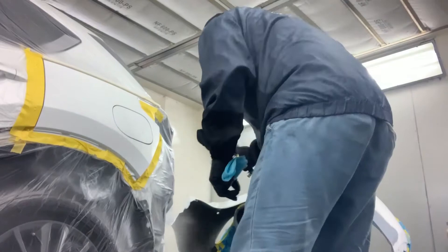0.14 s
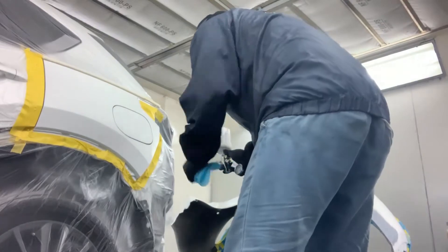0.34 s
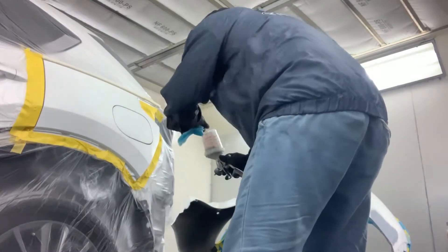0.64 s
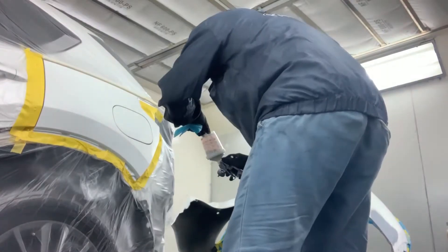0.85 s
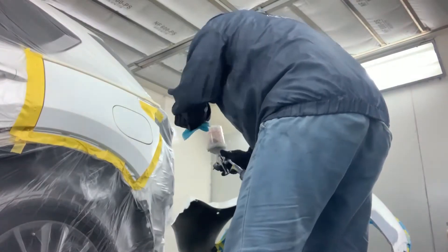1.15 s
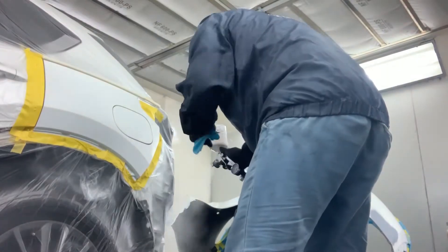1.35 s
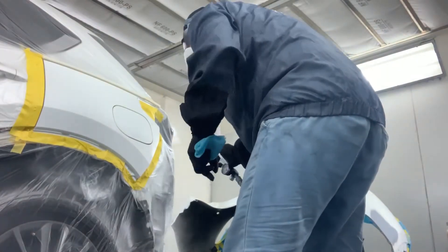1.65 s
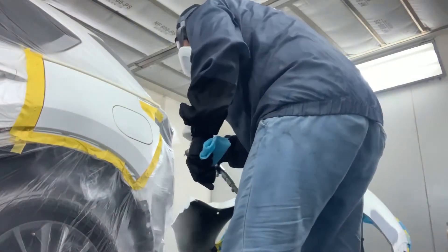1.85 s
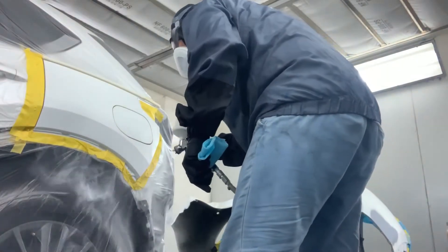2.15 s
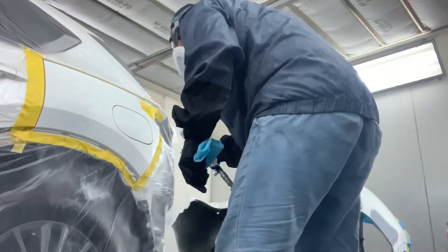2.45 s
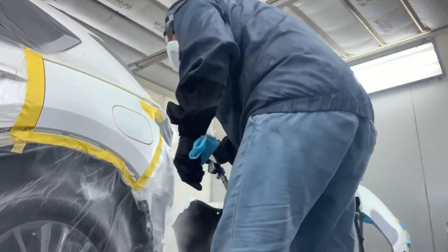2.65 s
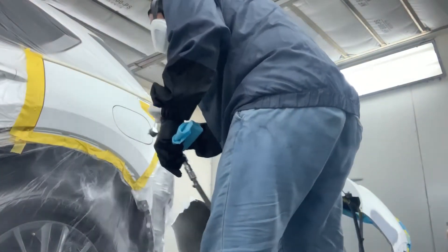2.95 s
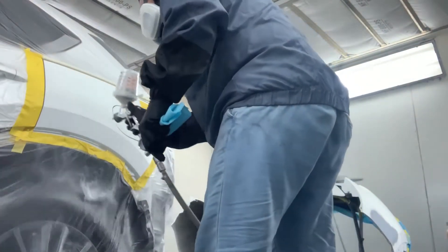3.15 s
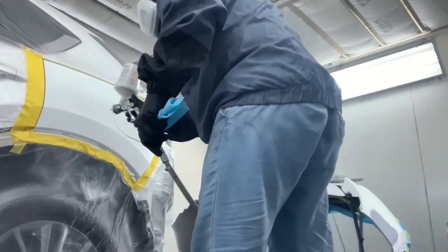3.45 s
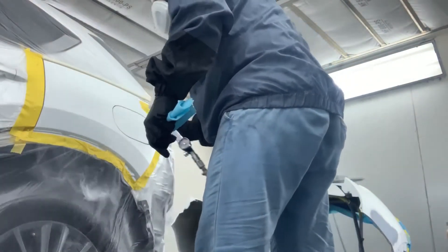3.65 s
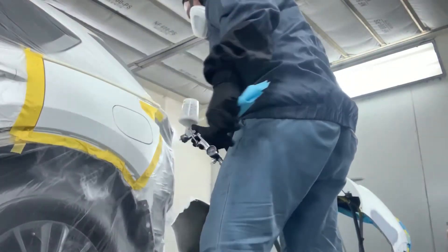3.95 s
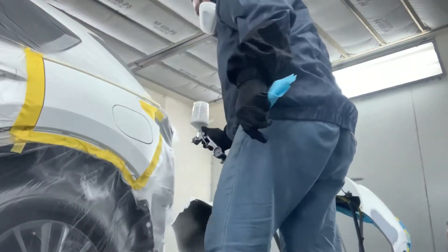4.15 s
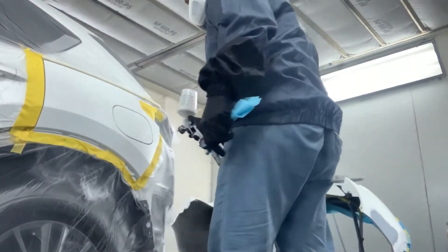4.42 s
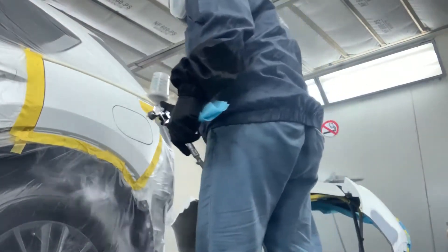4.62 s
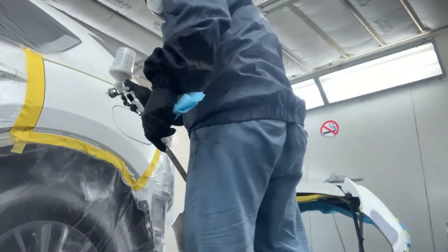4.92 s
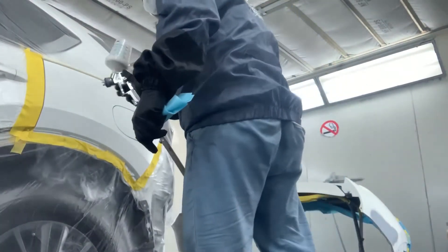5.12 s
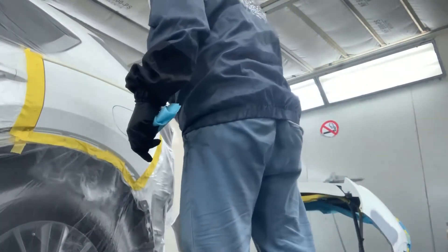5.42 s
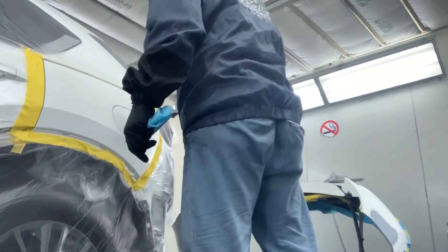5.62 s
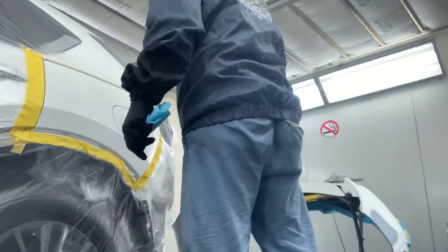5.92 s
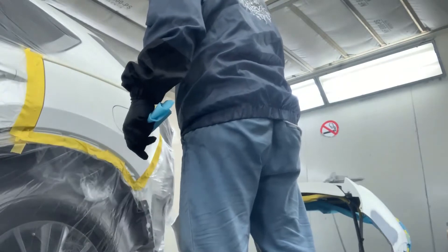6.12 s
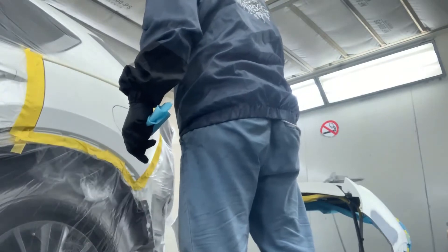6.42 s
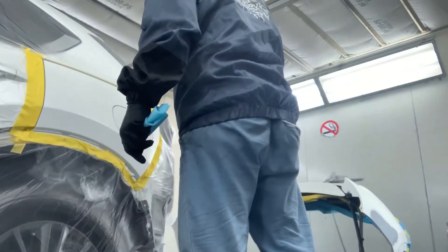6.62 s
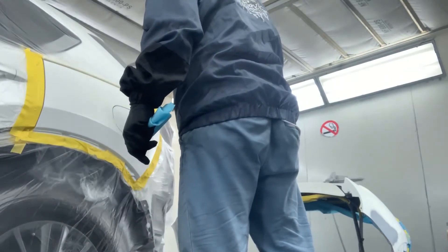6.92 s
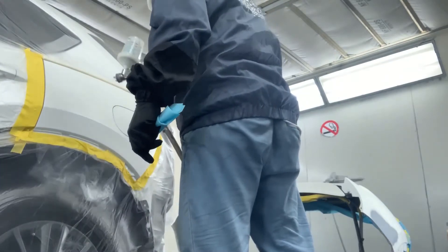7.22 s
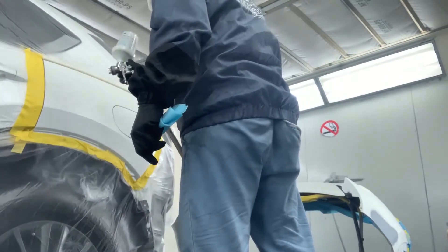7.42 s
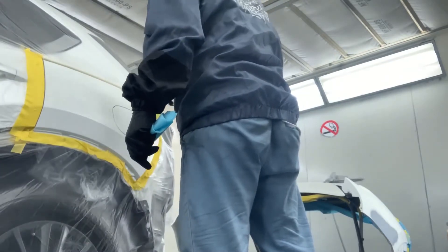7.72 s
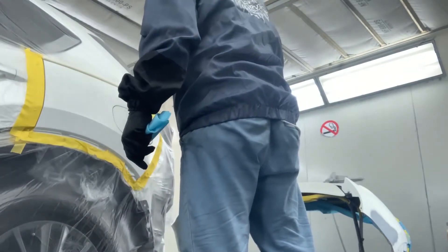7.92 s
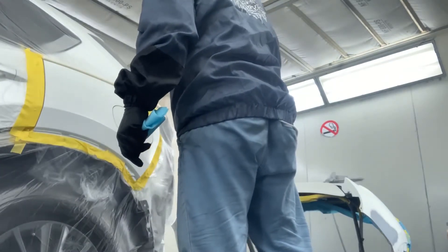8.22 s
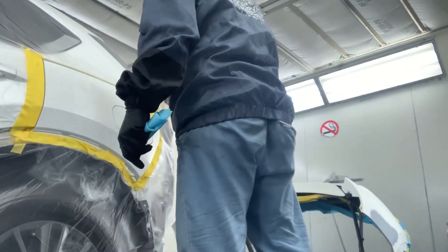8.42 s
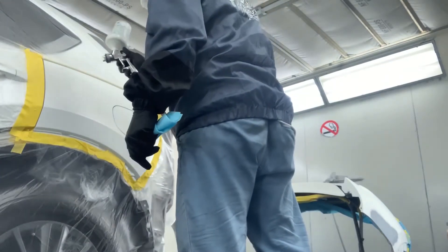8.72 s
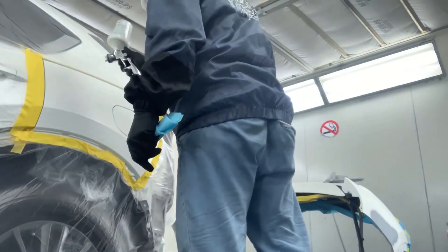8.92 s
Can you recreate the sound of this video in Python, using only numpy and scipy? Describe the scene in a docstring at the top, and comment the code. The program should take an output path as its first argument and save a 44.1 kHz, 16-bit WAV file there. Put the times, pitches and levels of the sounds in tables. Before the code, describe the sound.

Close stereo microphones in an enclosed paint booth. A continuous bed of low, rumbling ventilation air, a fan hum around 180 Hz that beats and flutters, and a deep duct boom that surges unevenly, strongest around 3, 6 and 8 seconds. Over it, a spray gun hisses very bright and dry, reaching the left side first, with a duller wash from panel and walls. A short spray ends at 0.2 s; a softer-opening one runs 0.35 to 1.1, then 1.3 to 1.65, 1.75 to 2.25, 2.35 to 2.7, a long one 2.8 to 4.3, another 4.4 to 6.0, a short, faint one 6.2 to 6.75, a long one 6.8 to 8.85, and a last from 8.9 to the end. Many start with a small spit; all stop abruptly. The hiss flares near 3.5, 5.15 and 7.5 s and dims when turned away, around 6.5 and 8.2. Cloth brushes softly at 0.1 and 0.4 s.

```python
"""A paint booth: a compressed-air spray gun works along a car's wing, its trigger let go between passes.
The jet is bright gated noise, earlier at the left; panel and hard walls return a duller, diffuse wash.
Overalls brush softly: two short swells of cloth-coloured noise.
Behind, fan tones and a duct boom are wavering sines; air in the ducts is coloured, resonant noise."""
import sys
import numpy as np
from scipy import signal
from scipy.fft import rfft, irfft, next_fast_len
from scipy.io import wavfile
from scipy.ndimage import uniform_filter1d, map_coordinates

SR = 44100
rng = np.random.default_rng(int(sys.argv[2]) if len(sys.argv) > 2 else 0)


def persist_wave(psi):
    """Save psi, clipped to +-1, as 16-bit WAV."""
    counts = np.round(np.clip(psi, -1, 1) * 32767).astype(np.int16)
    wavfile.write(sys.argv[1], SR, np.atleast_2d(counts).T)


N = 399546

# trigger pulls: [pull t/s, release t/s, valve opening time/s, spit on opening/dB, wash level/dB,
# bright edge re jet/dB]
TRIGGER_PULLS = [(0, 0.18, 0.015, -0.5, -35, 1), (0.352, 1.136, 0.1, 0, -39, 2.5),
                 (1.273, 1.651, .0065, 1, -35.5, 1.5), (1.7435, 2.264, 0.0065, 2.5, -34.5, -1),
                 (2.3425, 2.685, .006, 4, -35.5, -1.5), (2.771, 4.282, 0.008, 3.5, -35.5, -2),
                 (4.378, 6.016, 0.014, 3.5, -35.5, 0.5), (6.237, 6.745, 0.015, 0, -35.5, -0.5),
                 (6.826, 8.84, 0.015, 1, -34.5, -1), (8.913, 9.100, 0.013, 2.5, -35.5, -0.5)]
# how squarely the gun faces the microphones as the arm sweeps: [t/s, nozzle hiss level/dB]
GUN_AIM = [(0.2, -25.5), (0.5, -21), (0.9, -22), (1.3, -26.5), (1.62, -28.5), (1.8, -25.5), (2.9, -25.5),
           (3.15, -22.5), (3.9, -23), (4.3, -26.3), (4.7, -22), (5.05, -22), (5.6, -27), (6.55, -30),
           (7.0, -26.5), (7.4, -22.5), (8.0, -28.5), (8.4, -28), (8.85, -22.5)]
# jet swings past as the wrist turns: [t/s, half length/s, jet gain/dB, extra bright edge/dB]
WRIST_FLARES = [(0.47, .05, 1, 0), (3.46, 0.054, 3, 2), (3.98, 0.15, -0.5, 4.5), (5.152, 0.083, 5, -2),
                (7.476, .055, 2, 4.5)]
# direct jet spectrum: [f/Hz, relative density/dB]
JET_SPECTRUM = [(1500, -36), (4000, -14.5), (6000, -9.5), (7400, -4.5), (9000, -1.6), (11500, 1),
                (13000, 0.5), (15500, 1)]
# spectrum of the wash off panel and walls: [f/Hz, relative density/dB]
WASH_SPECTRUM = [(500, -22), (1500, -10), (2200, 3), (3000, 0.5), (4100, 2.5), (6000, 2.5), (8000, 3),
                 (11000, -52), (15500, 0)]
# near surfaces mirroring the moving nozzle: [mean extra path time/s, level re direct/dB]
NEAR_MIRRORS = [(0.0007, -17), (0.0016, -11), (0.0029, -11.5), (0.0047, -6)]
# overalls brushing as the painter leans in: [middle t/s, half length/s, level/dB]
CLOTH_BRUSHES = [(0.127, 0.061, -34), (0.42, 0.1, -27.5)]
# rubbing cloth spectrum: [f/Hz, relative density/dB]
CLOTH_SPECTRUM = [(150, -10), (300, 5), (480, 5.5), (700, -6), (1050, -5), (1600, -14), (2500, -23),
                  (8000, -33), (15500, -50)]
# fan tones: [multiple of shaft rate, level re airflow/dB]
FAN_TONES = [(3, -6.7), (4, -17.5), (5, -22.5), (6, -21.5)]
# air surges and ebbs in the main duct: [t/s, boom gain/dB, fan tone gain/dB]
DUCT_SURGES = [(0.13, -10, 4), (0.65, 0, 5), (0.82, 8, -0.5), (1.16, -4, 1), (1.88, 7, 1.5), (2.42, -3, 3),
               (2.83, 9, 1.5), (3.08, 11, -4), (3.45, 8, 7), (3.86, 1.5, 6), (4.18, -3, 4.5), (4.8, 9, 7.5),
               (5.83, 12, 8), (6.76, 7.5, 5), (7.05, 0, 2.5), (7.55, -12, 4.5), (7.76, 11.5, 6.5),
               (7.92, 5.5, -1), (8.13, 9, 6.5), (8.5, -1, 5)]
# ventilation airflow, reference for rush, ducts, tones and boom: [t/s, level/dB]
AIRFLOW = [(0, -21.5), (0.88, -21), (1.1, -24), (2.3, -24.5), (3.4, -24), (4.2, -24.5), (5.5, -24),
           (6.4, -24), (7.0, -23), (7.8, -23), (9.05, -22.5)]
# air in ducts and filters: [f/Hz, relative density/dB]
RUSH_SPECTRUM = [(20, -29), (33, -18), (43, -1.5), (70, 1.1), (108, -3), (165, -2), (260, -2), (400, -5.5),
                 (560, -13.5), (1000, -20), (1250, -22.5), (1660, -24), (2100, -34), (4400, -37.5),
                 (5600, -43), (15500, -51)]
# duct and booth resonances: [f/Hz, half width at -6 dB/Hz, relative level/dB]
DUCT_MODES = [(43, 2.2, -3.5), (81.8, 4.4, 4.5), (94.5, 3.3, 6.5), (123.6, 2.6, 1), (136.3, 5.7, -4.5),
              (202, 3.7, 3.5), (232, 5.2, 5), (243.4, 3.1, 2), (400, 2.4, -5.5), (450, 16.2, -7.5),
              (760, 42, -18.5), (1077, 45, -20.5)]
# left-right correlation of ventilation and cloth: [f/Hz, correlation/1]
DIFFUSE_LIKENESS = [(60, 1), (130, 0.92), (290, 0.86), (450, 0.31), (640, 0.086), (1400, 0.14),
                    (15000, 0.17)]

# left-right correlation of jet and wash: [f/Hz, correlation/1]
JET_LIKENESS = [(3000, 0.7), (9000, 0.92)]
WASH_LIKENESS = [(2000, 0.06), (12000, 0.55)]

LEFT_LEAD_S, EDGE_HZ = 0.000264, 12000
SPIT_HALF_S = 0.041  # bare air before paint flows
BURST_DB, BURST_HALF_S = 0.5, 0.006  # stored pressure as the valve cracks open
SHUT_DB, SHUT_S = 1, 0.017  # drop on release and its time constant
JET_FALL_DB_PER_S, WASH_FALL_DB_PER_S = 227, 220
WASH_BUILD_S = 0.011  # added to the opening time
WASH_DB_PER_AIM_DB = 0.73
PATH_DRIFT_S, PATH_DRIFTS_PER_S = 0.000151, 2.5
SHAFT_HZ, SURGE_HALF_S = 60.1, 0.12
SWELL_DB, SWELLS_PER_S, FLUTTER_DB, FLUTTERS_PER_S = 0.7, 6, 2.5, 14
BEAT_HZ, BEAT_DB = 182.7, -16  # second, slightly faster rotor; level re airflow
BOOM_HZ, BOOM_DB = 87.96, -10  # main duct; level re airflow
TOP_HZ = 15780


def spray_gun():
    """A bright, directional jet at the nozzle, and its duller wash, which depends less on the aim."""
    aim_db, = curves(GUN_AIM)
    flare_db = sum(db * bell(t_s, half_s) for t_s, half_s, db, _ in WRIST_FLARES)
    bright_db = sum(db * bell(t_s, half_s) for t_s, half_s, _, db in WRIST_FLARES)

    jet_flow, edge_flow, wash_flow = np.zeros((3, N))
    for pull_s, release_s, opening_s, spit_db, wash_db, edge_db in TRIGGER_PULLS:
        open_s = pull_s + opening_s
        kick_db = spit_db * bell(open_s, SPIT_HALF_S) + BURST_DB * bell(open_s, BURST_HALF_S)
        flow = valve(pull_s, release_s, opening_s, JET_FALL_DB_PER_S) * amp(kick_db)
        jet_flow += flow
        edge_flow += flow * amp(edge_db + bright_db)
        wash_valve = valve(pull_s, release_s, opening_s + WASH_BUILD_S, WASH_FALL_DB_PER_S)
        wash_flow += wash_valve * amp(wash_db)

    flutter = wobble(220) + 0.4 * wobble(15)  # the paint breaks up unevenly

    hiss = mirrored(turbulence(slope(JET_SPECTRUM), JET_LIKENESS, patchy_db=1.83))
    lead_s = LEFT_LEAD_S / 2 * np.array([[1], [-1]])
    hiss = filtered(hiss, lambda hz: np.exp(2j * np.pi * hz * lead_s))
    edge = filtered(hiss, lambda hz: 1 - 1 / (1 + (hz / EDGE_HZ) ** 10))
    body = hiss - edge
    jet = (body * jet_flow + edge * edge_flow) * amp(aim_db + flare_db + 0.37 * flutter)

    wash = mirrored(turbulence(slope(WASH_SPECTRUM), WASH_LIKENESS, patchy_db=1.8))
    wash = walls(wash, depth_db=2.0, grain_hz=45)
    follow_db = WASH_DB_PER_AIM_DB * (aim_db - aim_db.mean())
    wash = wash * wash_flow * amp(follow_db + 0.3 * flutter + 0.29 * wobble(500))
    return jet + pan(wash, right_db=1.0)


def valve(pull_s, release_s, opening_s, fall_db_per_s):
    """Flow gain of one pull: quick opening, a small fast drop on release, then a steady fall in dB."""
    t_s = np.arange(N) / SR
    after_s = np.clip(t_s - release_s, 0, 1)
    opened = np.clip((t_s - pull_s) / opening_s, 0, 1) ** 2
    shut_db = SHUT_DB * (1 - np.exp(-after_s / SHUT_S))
    return opened * amp(-shut_db - fall_db_per_s * after_s)


def mirrored(x):
    """Near reflections comb the hiss; the comb slides as the hand moves. Output rms 1."""
    out = x.copy()
    for delay_s, db in NEAR_MIRRORS:
        path_s = delay_s + PATH_DRIFT_S * wobble(PATH_DRIFTS_PER_S)
        at = np.arange(N) - SR * path_s
        out += amp(db) * np.array([map_coordinates(side, [at]) for side in x])
    return unit(out)


def overalls():
    """Rubbing cloth: coloured noise in soft sweeps."""
    sweep = sum(amp(db) * bell(middle_s, half_s) for middle_s, half_s, db in CLOTH_BRUSHES)
    return sweep * turbulence(slope(CLOTH_SPECTRUM), DIFFUSE_LIKENESS, patchy_db=2)


def fan():
    """Rotor tones follow the airflow, beat and waver in uneven air; the main duct booms below them."""
    flow_db, = curves(AIRFLOW)
    boom_db = flow_db + sum(db * bell(t_s, SURGE_HALF_S) for t_s, db, _ in DUCT_SURGES)
    blade_db = flow_db + sum(db * bell(t_s, SURGE_HALF_S) for t_s, _, db in DUCT_SURGES)
    blade_db = blade_db + SWELL_DB * wobble(SWELLS_PER_S)

    shaft_phase = phase(SHAFT_HZ * (1 + 0.00495 * wobble(8)))
    hum = phase(BEAT_HZ * (1 + 0.0044 * wobble(6)))
    hum = amp(flow_db + BEAT_DB) * np.sin(hum)
    for multiple, db in FAN_TONES:
        tone_db = blade_db + db + FLUTTER_DB * wobble(FLUTTERS_PER_S)
        hum += amp(tone_db) * np.sin(multiple * shaft_phase)

    boom_phase = phase(BOOM_HZ * (1 + 0.0752 * wobble(18)))
    boom_db = boom_db + BOOM_DB + 2.5 * wobble(15) + 0.58 * wobble(35)
    boom = amp(boom_db) * np.sin(boom_phase)
    # sqrt(2): levels are rms
    return np.sqrt(2) * (pan(hum, right_db=-0.5) + pan(boom, right_db=0.5))


def ventilation():
    """Moving air rushes through the filters and excites the ducts' resonances."""
    flow_db, = curves(AIRFLOW)
    rush = turbulence(slope(RUSH_SPECTRUM), DIFFUSE_LIKENESS, patchy_db=1.44)
    ducts = turbulence(resonances(DUCT_MODES), DIFFUSE_LIKENESS, patchy_db=1.5)
    air = amp(flow_db + 0.64) * rush + amp(flow_db - 1.5) * ducts
    return pan(walls(air, depth_db=1.5, grain_hz=20), right_db=1.2)


def turbulence(colour, alike, patchy_db):
    """Coloured stereo noise of rms 1, with drifting time-frequency patches of random gain."""
    z = signal.stft(rng.standard_normal((2, N)), nperseg=512)[2]
    field = uniform_filter1d(rng.standard_normal(z.shape[1:]), size=6, axis=0)
    field = uniform_filter1d(field, size=14, axis=1)
    pair = signal.istft(z * amp(patchy_db * unit(field)), nperseg=512)[1][:, :N]

    def mid_side(hz):
        # cos(2 * turn) is the left-right correlation
        turn = np.arccos(np.clip(along(alike, hz), -1, 1)) / 2
        return colour(hz) * np.array([np.cos(turn), np.sin(turn)])

    mid, side = filtered(pair, mid_side)
    return unit(np.array([mid + side, mid - side]))


def walls(x, depth_db, grain_hz):
    """Standing waves give each microphone its own fixed spectral ripple above the bass."""
    knots = rng.standard_normal((2, 4096))

    def response(hz):
        ripple = np.array([np.interp(hz / grain_hz, np.arange(len(k)), k) for k in knots])
        return amp(depth_db * ripple * hz / (hz + 400))

    return filtered(x, response)


def resonances(modes):
    """Response of a set of air resonances, summed in power."""
    def response(hz):
        power = sum(amp(db) ** 2 / (1 + ((hz - centre_hz) / width_hz) ** 2) ** 2
                    for centre_hz, width_hz, db in modes)
        return np.sqrt(power)

    return response


def slope(points):
    """Response of a smooth spectrum."""
    return lambda hz: amp(along(points, hz))


def filtered(x, response):
    """x through a complex response of frequency."""
    m = next_fast_len(N + 8192)
    return irfft(rfft(x, m) * response(np.fft.rfftfreq(m, 1 / SR)), m)[..., :N]


def pan(x, right_db):
    """Raise right over left by right_db."""
    return x * amp(np.array([[-right_db], [right_db]]) / 2)


def phase(hz):
    """Phase in radians of a varying frequency."""
    return 2 * np.pi * np.cumsum(hz) / SR


def bell(middle_s, half_s):
    """Gaussian bump of height 1; 1/e at half_s from the middle."""
    return np.exp(-((np.arange(N) / SR - middle_s) / half_s) ** 2)


def wobble(rate_hz):
    """Smooth random curve, rate_hz knots a second."""
    knots = rng.standard_normal(int(N * rate_hz / SR) + 4)
    return map_coordinates(knots, [np.arange(N) * rate_hz / SR])


def curves(rows):
    """One value per sample for each column after the time."""
    t_s, *cols = np.transpose(rows)
    return [np.interp(np.arange(N) / SR, t_s, c) for c in cols]


def along(points, hz):
    """Interpolate (f/Hz, value) points on a log frequency axis."""
    f_hz, v = np.transpose(points)
    return np.interp(np.log(hz + 1), np.log(f_hz + 1), v)


def unit(x):
    """Scale to rms 1."""
    return x / np.sqrt(np.mean(x ** 2) + 1e-20)


def amp(db):
    """Decibels to gain."""
    return 10 ** (np.asarray(db) / 20)


def scene():
    """The gun at work, the overalls, the fan and its ventilation."""
    return spray_gun() + overalls() + fan() + ventilation()


def record(dry):
    """Band limit: nothing passes from TOP_HZ up."""
    return filtered(dry, lambda hz: hz < TOP_HZ)


dry = scene()
out = record(dry)
persist_wave(out)
```